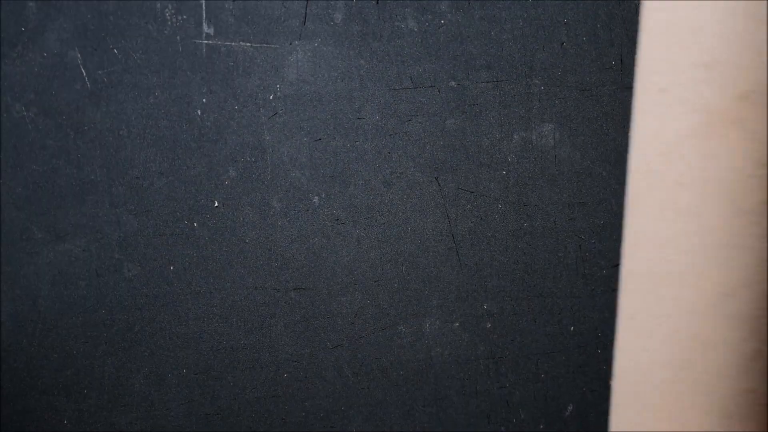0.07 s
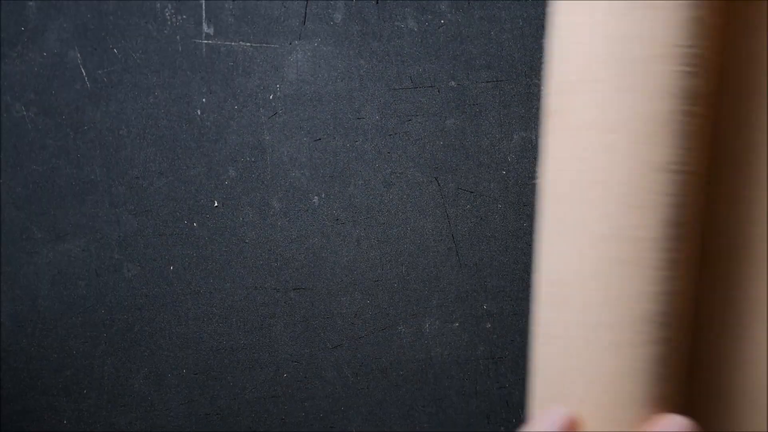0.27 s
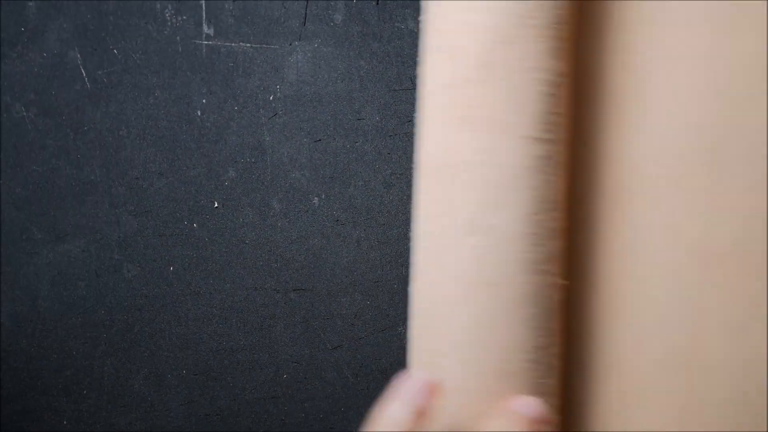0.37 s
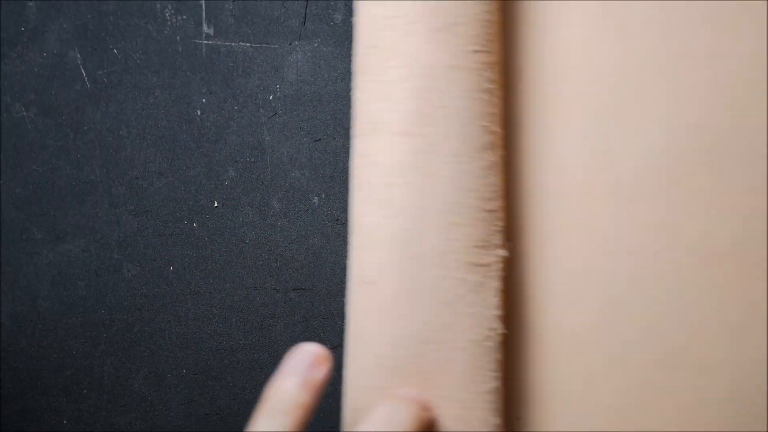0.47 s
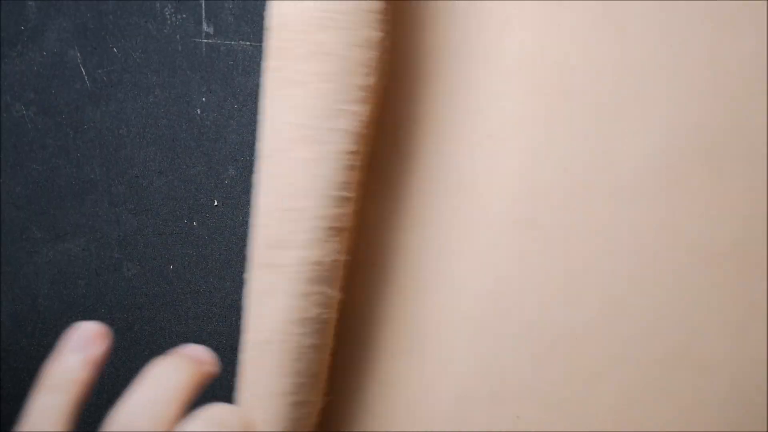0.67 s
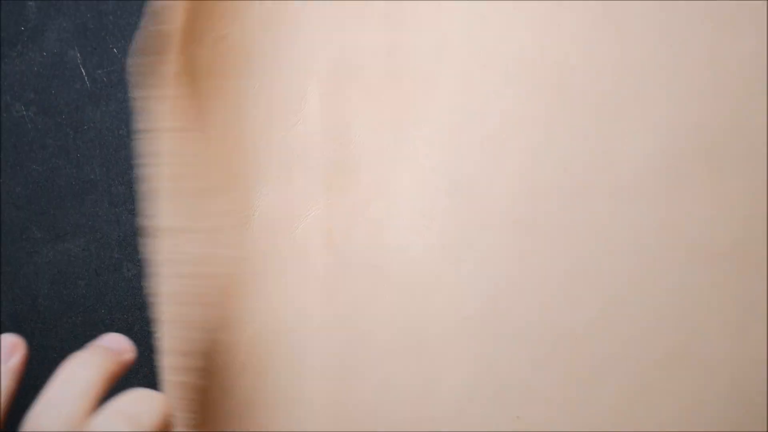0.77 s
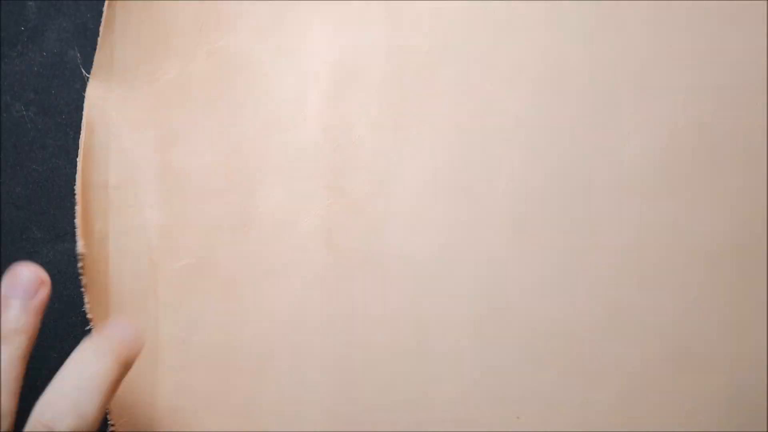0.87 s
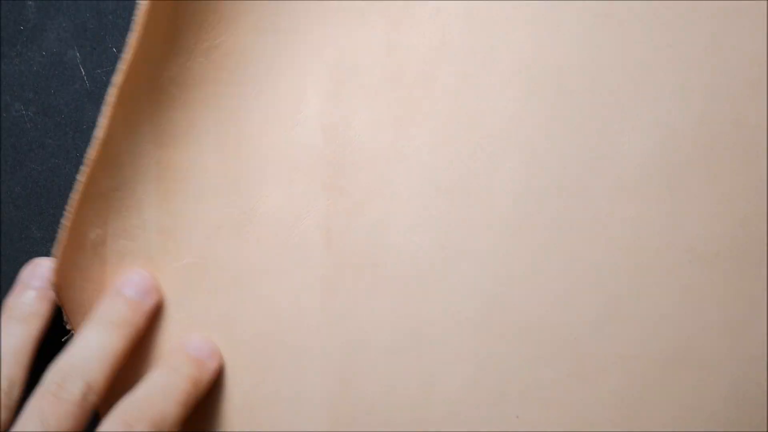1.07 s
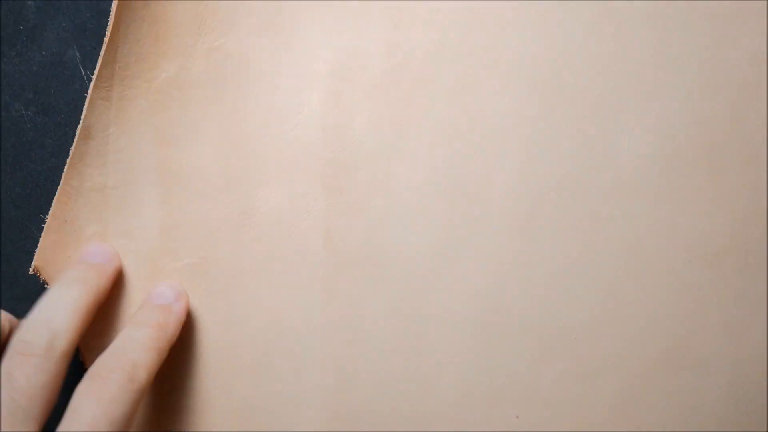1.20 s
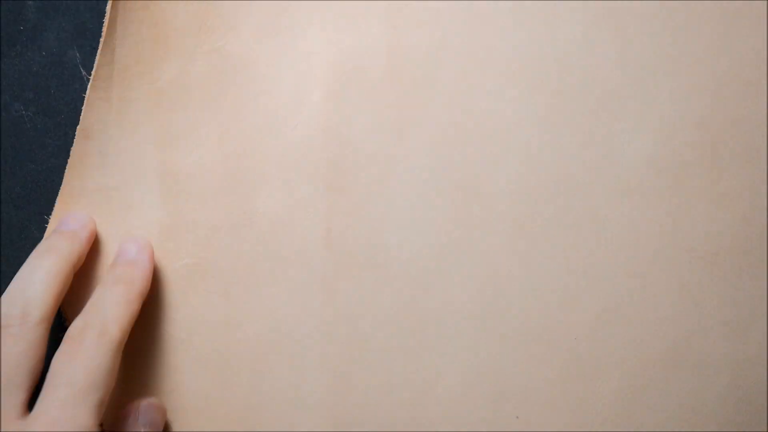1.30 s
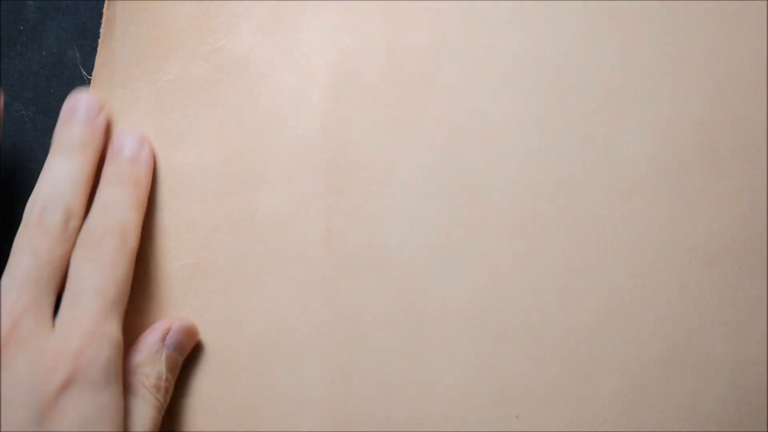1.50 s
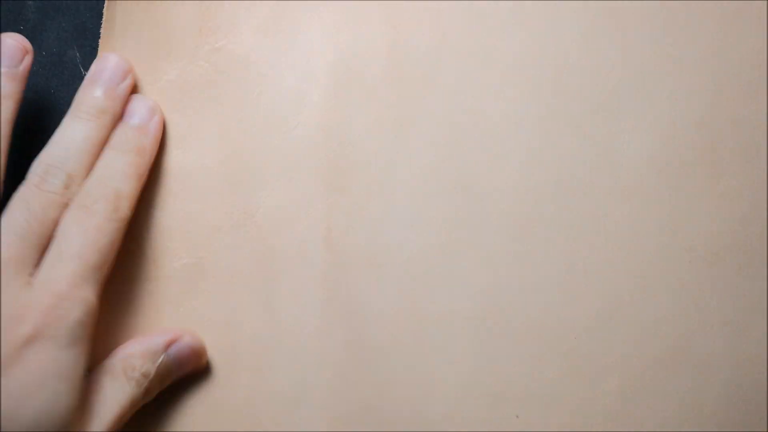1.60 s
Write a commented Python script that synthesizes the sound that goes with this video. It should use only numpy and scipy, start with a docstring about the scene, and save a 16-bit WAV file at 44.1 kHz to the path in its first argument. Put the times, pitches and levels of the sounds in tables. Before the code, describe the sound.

Stiff leather crackles as it is unrolled, then flaps down and is smoothed by hand.

```python
"""A work table in a small quiet room, with a roll of stiff leather pushed open close to the microphone.
The hollow coil rumples and peels apart, and its fibres crackle and snap, ringing the sheet.
The loose end swishes over, flaps and pats down, sounding the air gap as it closes on the table.
Then fingers glide over the flat hide with a fine hiss. All the rubbing is a stream of tiny slips."""
import sys
import numpy as np
from scipy import signal
from scipy.io import wavfile
from scipy.ndimage import uniform_filter1d

SR = 44100
rng = np.random.default_rng(int(sys.argv[2]) if len(sys.argv) > 2 else 0)


def dump(signal):
    """Clip the signal to [-1, 1] and save it as 16-bit WAV at the path in sys.argv[1]."""
    limited = np.clip(np.atleast_2d(signal).T, -1, 1)
    pcm = np.round(limited * 32767).astype(np.int16)
    wavfile.write(sys.argv[1], SR, pcm)


N = 72765
T = np.arange(N) / SR
BAND_LIMIT_HZ = 15950


def amp(db):
    """Decibels to gain."""
    return 10 ** (np.asarray(db) / 20)


def unit(x):
    """Scales to rms 1."""
    return x / np.sqrt(np.mean(x ** 2) + 1e-20)


def read(points, hz):
    """Reads a table on a log-frequency axis."""
    freqs, values = np.transpose(points)
    return np.interp(np.log(hz + 1), np.log(freqs + 1), values)


def add(mix, start_s, sound):
    """Adds a sound at its time."""
    part = mix[round(start_s * SR):][:len(sound)]
    part += sound[:len(part)]


def colour(x, spectrum, size=4096):
    """Causal filter with the given spectrum."""
    log_gain = np.log(amp(read(spectrum, abs(np.fft.fftfreq(size, 1 / SR)))))
    minimum_phase = np.exp(np.conj(signal.hilbert(log_gain)))
    taps = np.fft.ifft(minimum_phase).real[:size // 2]
    return signal.fftconvolve(x, taps)[:len(x)]


def cut(x, hz, kind):
    """Second-order low-pass or high-pass."""
    return signal.sosfilt(signal.butter(2, hz, kind, fs=SR, output="sos"), x)


def resonate(x, hz, width_hz):
    """A resonance that follows the curve hz."""
    turn = np.exp(2j * np.pi * np.cumsum(hz) / SR)
    pole = np.exp(-np.pi * width_hz / SR)
    return 2 * (turn * signal.lfilter([1 - pole], [1, -pole], x / turn)).real


def steady(x, size=256):
    """Evens out the slow level of a noise, leaving its grain."""
    return x / np.sqrt(abs(uniform_filter1d(x ** 2, size)) + 1e-20)


def friction(levels, spectrum, slips_per_s, spread_db):
    """Many tiny slips of uneven size, coloured by the surface."""
    strength = amp(spread_db * np.minimum(rng.exponential(1, N), 4))
    slips = strength * rng.choice([-1, 1], N) * (rng.random(N) < slips_per_s / SR)
    envelope = amp(np.interp(T, *np.transpose(levels)))
    return envelope * steady(colour(slips, spectrum), size=1500)


# The microphone's noise floor: freq_hz, relative_db
HISS_SPECTRUM = [(30, -4.5), (150, 5.5), (500, 8.5), (2000, 1.5), (6000, 7.5), (16000, 4.5)]

def microphone_hiss(level_db=-70):
    """The microphone's own noise, separate in each channel."""
    return amp(level_db) * np.array([unit(colour(z, HISS_SPECTRUM)) for z in rng.standard_normal((2, N))])


# Decay of the small room: freq_hz, t60_s
ROOM_DECAY = [(100, 0.21), (1000, 0.18), (5000, 0.074), (16000, 0.24)]

def room_tail(x, size=16384):
    """A short tail of sparse reflections, starting after 4 ms."""
    taps = rng.choice([-1, 1], size) * (rng.random(size) < .1) * (T[:size] > .004)
    hz, t, bands = signal.stft(taps, SR, nperseg=256)
    decay = amp(-60 * t / read(ROOM_DECAY, hz)[:, None])
    tail = signal.istft(bands * decay, SR, nperseg=256)[1]
    return signal.fftconvolve(x, tail / np.linalg.norm(tail))[:N]


# First reflections off the table and things near the microphone: delay_s, gain
EARLY_ECHOES = [(.0024, 0.15), (.0046, .07), (.0083, .07), (0.0136, 0.043)]
# Room tail in the stereo side signal, against the direct sound: freq_hz, gain_db
SIDE_SPECTRUM = [(40, -19), (130, -27), (300, -39), (2000, -35), (6000, -32), (14000, -32)]

def small_room(direct, tail_db=-14.5):
    """Close sound in the centre, with faint reflections and a trace of width."""
    mid = direct + amp(tail_db) * room_tail(direct)
    for delay_s, gain in EARLY_ECHOES:
        add(mid, delay_s, gain * direct)
    side = colour(room_tail(direct), SIDE_SPECTRUM)
    return np.array([mid + side, mid - side])


# Faint low knocks in the table top: start_s, level_db
TABLE_THUMPS = [(0.43, -73), (1.028, -62), (1.399, -65.5)]

def table_thumps(pitch_hz=136, rise_s=0.0057):
    """The hand's weight reaches the table and knocks it."""
    out = np.zeros(N)
    knock = T / rise_s * np.exp(1 - T / rise_s) * np.sin(2 * np.pi * pitch_hz * T)
    for start_s, level_db in TABLE_THUMPS:
        add(out, start_s, amp(level_db) * knock)
    return out


# Low, even rub on the table: time_s, level_db
SLIDE_LEVELS = [(.2, -70), (.5, -64), (.75, -65), (.9, -68), (1.15, -64), (1.45, -64.5), (1.65, -65)]
# Its dull tone: freq_hz, relative_db
SLIDE_SPECTRUM = [(30, -27), (90, -12), (200, -2.5), (370, 0.5), (600, 0), (850, -2.5), (1400, -5),
                  (3200, -10.5), (6000, -15.5), (16000, -19)]

def hide_slide():
    """The hide slides on the table in small, even slips."""
    return friction(SLIDE_LEVELS, SLIDE_SPECTRUM, slips_per_s=11000, spread_db=1.5)


# Finger strokes near the microphone: time_s, level_db
GLIDE_LEVELS = [(.2, -97), (.5, -73.5), (.6, -60), (.7, -66), (.8, -101), (1.0, -70), (1.1, -60),
                (1.17, -61.5), (1.24, -70.5), (1.29, -62), (1.35, -82), (1.39, -58), (1.45, -63),
                (1.53, -57), (1.57, -61), (1.61, -64.5), (1.65, -62)]
# Their bright tone: freq_hz, relative_db
GLIDE_SPECTRUM = [(500, -23), (2500, -3), (5000, 3.5), (8000, 1.5), (12000, -1), (16000, -3)]

def finger_glide():
    """Skin glides on the grain side, its dense slips merging into a fine hiss."""
    return friction(GLIDE_LEVELS, GLIDE_SPECTRUM, slips_per_s=23000, spread_db=4.0)


# Swishes across the hide: time_s, level_db
BRUSH_LEVELS = [(.2, -63.5), (.53, -63), (.58, -54.5), (.615, -57.5), (.64, -58.5), (.675, -55),
                (.76, -60.5), (.89, -67.5), (.93, -59.5), (1.0, -64.5), (1.08, -69), (1.22, -68.5),
                (1.31, -65), (1.358, -76), (1.378, -49), (1.39, -48.5), (1.40, -64), (1.45, -61.5),
                (1.53, -62.5), (1.56, -58.5), (1.6, -69)]
# Their midrange tone: freq_hz, relative_db
BRUSH_SPECTRUM = [(200, -47.5), (600, -4.5), (900, -4), (1400, 2), (2200, -3.5), (3000, -4.5), (6000, -16),
                  (10000, -21.5), (16000, -26.5)]

def hide_brush():
    """The loose end and the hand brush across the hide."""
    return friction(BRUSH_LEVELS, BRUSH_SPECTRUM, slips_per_s=11000, spread_db=3.5)


# Leather and fingertips landing: start_s, rise_s, decay_s, level_db, pitch_hz, slide_octaves_per_s
LANDINGS = [(0.579, 0.017, 0.034, -53, 1330, 8), (.612, 0.024, 0.015, -38.5, 1136, -11.5),
            (0.817, .013, 0.0038, -51.5, 1070, 5), (.851, 0.0099, 0.0053, -57, 430, 12),
            (.957, 0.0009, 0.0072, -51, 1600, -13), (0.963, 0.003, 0.012, -52.5, 457, -7),
            (1.013, 0.0095, 0.0072, -47.5, 1580, -34), (1.020, 0.0029, 0.023, -51.5, 398, -3),
            (1.154, 0.0011, 0.005, -52, 1540, 5), (1.164, 0.0088, 0.005, -56.5, 480, 2),
            (1.299, 0.0024, 0.0086, -46, 1580, 7), (1.305, 0.0066, 0.016, -44.5, 926, -22),
            (1.319, 0.013, 0.0071, -57, 370, -11), (1.360, 0.019, .009, -50, 1230, 33)]
# The scuff in each landing: freq_hz, relative_db
SCUFF_SPECTRUM = [(100, -46), (350, 6), (1500, -14), (3000, 2.5), (6000, -7), (16000, -28)]

def pats(scuff_db=-14):
    """Soft landings: a hollow puff whose resonance slides as the air gap closes, and a little scuff."""
    out, t = np.zeros(N), np.arange(0, .15, 1 / SR)
    for start_s, rise_s, decay_s, level_db, hz, slide in LANDINGS:
        air, rub = rng.standard_normal((2, 16384))[:, :len(t)]
        pitch = np.clip(hz * 2 ** (slide * (t - rise_s)), hz / 2, hz * 2)
        for _ in range(2):
            air = resonate(air, pitch, width_hz=0.5 * hz)
        puff = steady(cut(air, 0.48 * hz, "high"))
        scuff = amp(scuff_db) * unit(colour(rub, SCUFF_SPECTRUM))
        envelope = np.minimum(t / rise_s, 1) * np.exp(-np.maximum(t - rise_s, 0) / decay_s)
        add(out, start_s, amp(level_db) * envelope * (puff + scuff))
    return out


# The turns of the roll parting: time_s, level_db
PEEL_LEVELS = [(.2, -62.5), (.26, -49.5), (.31, -62), (.36, -51), (.395, -55.5), (.445, -47.5), (.475, -54),
               (.52, -68), (.85, -62), (.93, -68), (1.0, -71), (1.09, -58.5), (1.2, -77)]
# Their rasp: freq_hz, relative_db
PEEL_SPECTRUM = [(200, -2), (800, 0), (1600, 3.5), (2800, 0.5), (6000, -4.5), (9000, -14), (16000, -23)]

def coil_peel():
    """The rough flesh side peels off the next turn."""
    return friction(PEEL_LEVELS, PEEL_SPECTRUM, slips_per_s=6700, spread_db=2.5)


# The coil rumpling against the table, close up: time_s, relative_db
RUMPLE_LEVELS = [(.2, -65.5), (.245, -67.5), (.265, -51), (.293, -44), (.315, -52), (.365, -49.5),
                 (.395, -61), (.42, -54), (.44, -45), (.462, -60), (.52, -78.5)]
# Its low-mid body: freq_hz, relative_db
RUMPLE_SPECTRUM = [(30, -27), (100, -31), (200, -16.5), (300, 0.5), (550, 4), (1200, -5), (2000, -8.5),
                   (5000, -28.5), (16000, -26)]
# Resonances of the coil: pitch_hz, width_hz, gain_db
COIL_MODES = [(321, 45, 3), (605, 42, 3.5), (927, 70, 0), (1310, 60, 9)]

def coil_rumple(gain_db=-4):
    """Coarse slips ring the hollow coil."""
    slips = friction(RUMPLE_LEVELS, RUMPLE_SPECTRUM, slips_per_s=1300, spread_db=1.5)
    hollow = sum(amp(db) * resonate(slips, np.full(N, hz), width) for hz, width, db in COIL_MODES)
    return amp(gain_db) * (slips + hollow)


# Echoes inside the coil and off the table: delay_s, gain
COIL_ECHOES = [(.0009, 0.13), (.0021, 0.16)]

def sheet_ring(t, hz, rise_s, decay_cycles=2.6):
    """The stiff sheet rings for a few cycles, with quick echoes."""
    def ring(age):
        envelope = (1 - np.exp(-age / rise_s)) * np.exp(-age * hz / decay_cycles)
        return envelope * np.sin(2 * np.pi * hz * age)
    echoes = sum(gain * ring(np.maximum(t - delay_s, 0)) for delay_s, gain in COIL_ECHOES)
    return unit(ring(t) + echoes)


# Tearing fibres at close range: freq_hz, relative_db
CRACK_SPECTRUM = [(200, -29), (700, -9), (1800, -2), (4000, 1), (7000, 0), (10000, -3.5), (16000, -8)]

def fibre_crack(t, hz, rise_s, decay_s=0.0027, spread_db=3.5):
    """A burst of uneven tearing that holds briefly, then stops; low snaps are duller."""
    fibres, strength = rng.standard_normal((2, 4096))[:, :len(t)]
    envelope = (1 - np.exp(-t / rise_s)) * np.exp(-(t / decay_s) ** 1.34)
    burst = fibres * amp(spread_db * np.clip(strength, -2, 2)) * envelope
    top_hz = min(2.54 * hz, BAND_LIMIT_HZ)
    return unit(cut(colour(burst, CRACK_SPECTRUM), top_hz, "low"))


# Snaps right by the microphone: start_s, relative_db, pitch_hz, crack_over_ring_db
FIBRE_SNAPS = [(0.2233, -45.5, 3060, -1), (.2354, -41.5, 2660, -0.5), (.2548, -51, 2660, 4),
               (.2976, -32, 5900, -3.5), (0.2973, -37, 2380, 3), (0.3195, -40.5, 6800, 6),
               (0.3207, -31.5, 4370, 1.5), (0.3313, -52, 2700, 9), (.3440, -47.5, 3720, 7),
               (0.3536, -36, 7140, 5), (.3546, -34.5, 4470, -4), (0.3682, -33.5, 3740, -1.5),
               (0.3701, -37.5, 3520, -5), (0.3888, -53, 3180, 5), (.4077, -43, 2570, 0.5),
               (.4200, -47, 2650, 6), (.4300, -49, 3370, 4), (0.435, -37.5, 6200, 3.5),
               (.4370, -38, 5200, 5.5), (0.4911, -50.5, 2030, 3), (.5010, -50.5, 4570, 3),
               (.6288, -45.5, 5310, 2.5), (0.917, -51.5, 1770, -0.5), (0.9263, -49, 6490, -9.5),
               (.9268, -50, 3600, -7), (0.9293, -49, 2600, 0.5), (0.971, -51, 1930, 7),
               (1.0295, -52, 2460, 1.5), (1.0336, -50.5, 3600, 6), (1.0730, -44.5, 2530, -1.5),
               (1.084, -53, 4570, 3), (1.1040, -52.5, 4620, -3), (1.2581, -45.5, 2610, 2.5),
               (1.2609, -55, 6300, -1.5)]

def fibre_snaps(gain_db=-7, rise_s=0.00027):
    """Fibres let go, each with a crack and a ring in the sheet."""
    out, t = np.zeros(N), np.arange(0, 0.014, 1 / SR)
    for start_s, db, hz, crack_db in FIBRE_SNAPS:
        snap = sheet_ring(t, hz, rise_s) + amp(crack_db) * fibre_crack(t, hz, rise_s)
        add(out, start_s, amp(db) * snap)
    return amp(gain_db) * out


def scene():
    """Leather and hand on the table, just in front of the microphone."""
    rubbing = coil_rumple() + coil_peel() + hide_brush() + hide_slide() + finger_glide()
    return small_room(rubbing + fibre_snaps() + pats() + table_thumps())


def record(dry):
    """The microphone's bass roll-off and faint hiss, a quick fade-in from silence, and the band limit."""
    heard = cut(dry, hz=55, kind="high") + microphone_hiss()
    fade_in = np.clip((T - .198) / .002, 0, 1)
    band_limit = signal.firwin(511, BAND_LIMIT_HZ, window=("kaiser", 9), fs=SR)
    return signal.oaconvolve(heard * fade_in, band_limit[None], "same")


dry = scene()
out = record(dry)
dump(out)
```